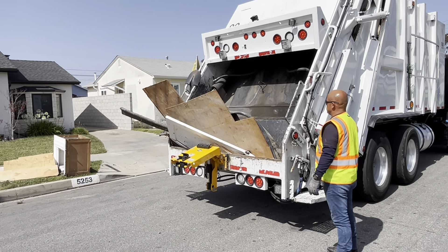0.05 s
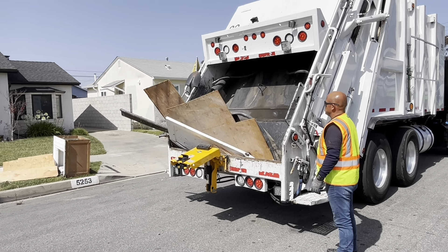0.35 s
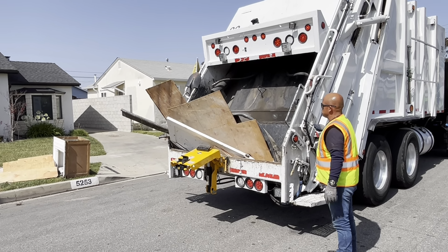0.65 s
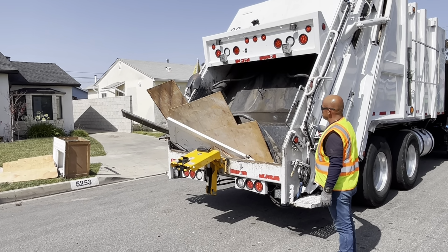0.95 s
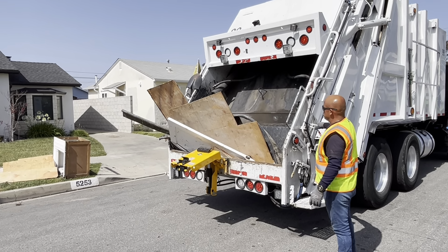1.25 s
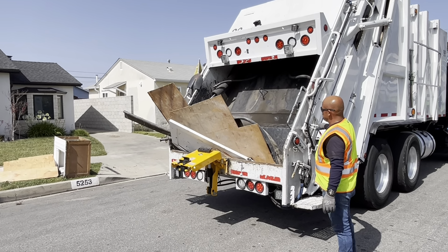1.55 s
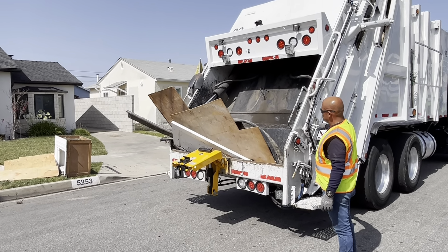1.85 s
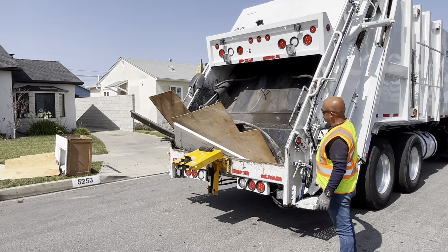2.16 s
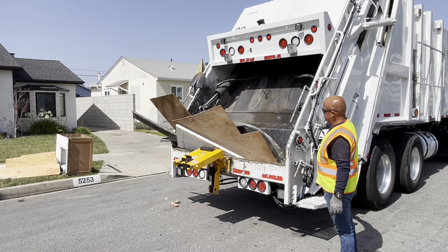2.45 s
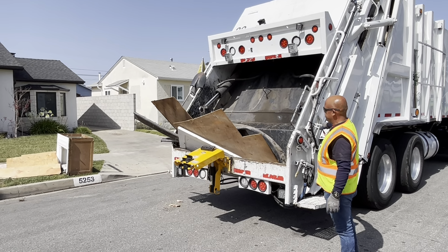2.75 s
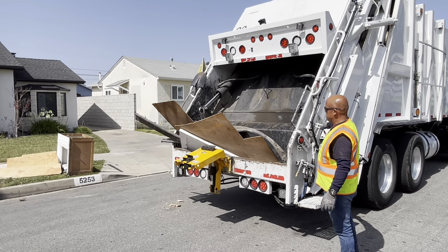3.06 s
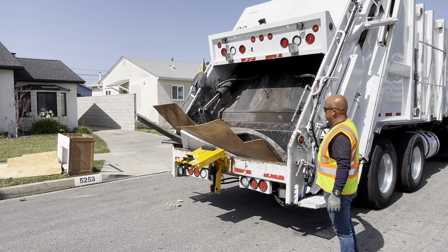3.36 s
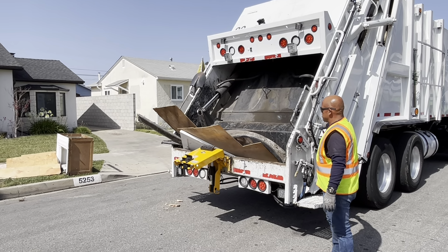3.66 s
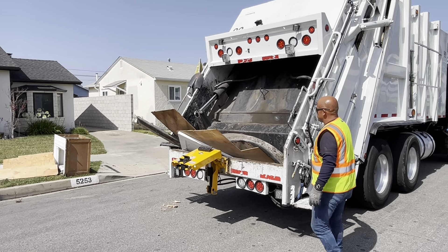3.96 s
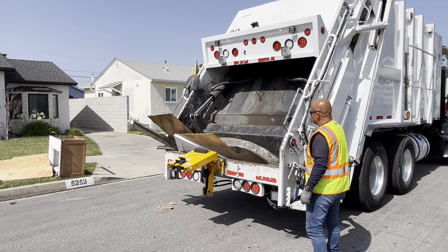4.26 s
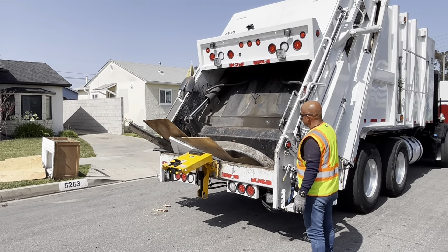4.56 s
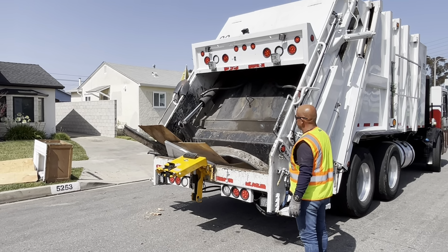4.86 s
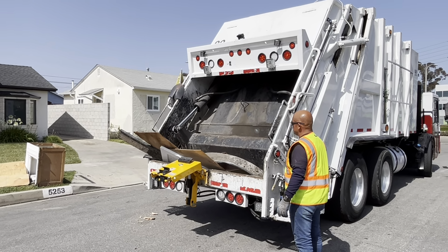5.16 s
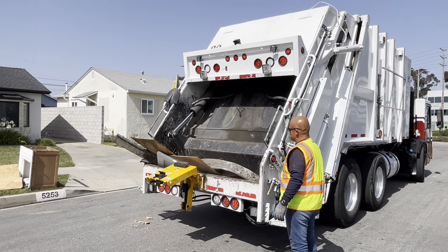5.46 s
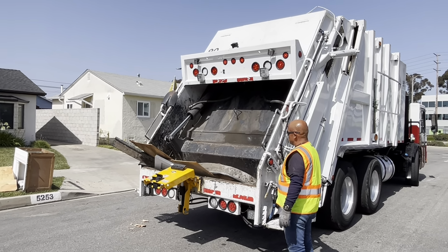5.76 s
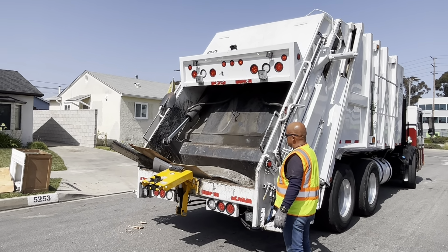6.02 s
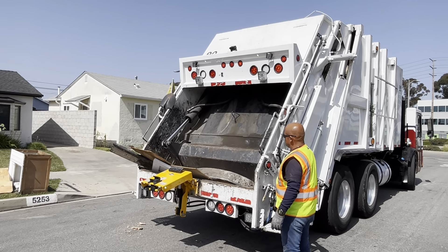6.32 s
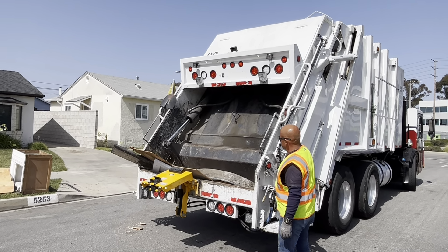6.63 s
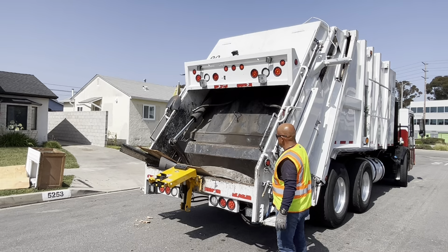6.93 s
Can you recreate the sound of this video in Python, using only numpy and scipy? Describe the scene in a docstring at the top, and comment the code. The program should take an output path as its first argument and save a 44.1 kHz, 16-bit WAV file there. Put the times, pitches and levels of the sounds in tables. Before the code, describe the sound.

Wood snaps, scrapes and grinds in a garbage truck's packer while the engine rumbles and the pump whines, then metal squeaks and clangs.

```python
"""A garbage truck's packer blade crushes a load of wood in a quiet street, a few steps from the listener.
From the start the diesel rumbles, the hydraulic pump hums and whines, and the load grinds and crackles.
Almost at once boards begin to thud, tick, snap and scrape in the hopper, the truck's steel loading bin.
From about 2 seconds on, sliding steel squeals faintly now and then. Around 6 seconds the load shifts
heavily; then a dry joint squeaks and, just before the end, a steel part clangs."""
import sys
import numpy as np
from scipy import signal
from scipy.fft import rfft, irfft, next_fast_len
from scipy.io import wavfile

SR = 44100
rng = np.random.default_rng(int(sys.argv[2]) if len(sys.argv) > 2 else 0)


def master(y):
    """Save y as 16-bit WAV."""
    cut = np.clip(np.atleast_2d(y).T, -1, 1)
    pcm = np.round(cut * 32767)  # scale
    wavfile.write(sys.argv[1], SR, pcm.astype(np.int16))


N = 308259  # length in samples, about 7 seconds

# Levels in the tables are relative: a function may turn a whole table up or down.
# How loudly the truck rumbles under load. Each row: time in seconds, level in dB.
RUMBLE_LEVELS = [(0, -29), (.6, -38), (.85, -34.5), (1.35, -36.5), (1.6, -39.5), (2.3, -36), (3.05, -38),
                 (3.3, -33.5), (3.9, -32.5), (4.95, -30), (5.5, -33), (5.8, -36), (5.98, -27),
                 (6.47, -23.5), (6.6, -34.5), (6.75, -25.5), (6.99, -34)]
# The tone colours of the diesel, the shaking body and the fan. Each row: frequency in Hz, level in dB.
DIESEL_SPECTRUM = [(15, -73), (30, -21), (50, -3), (78, 1), (100, -2.5), (160, -6.5), (220, -8),
                   (330, -14.5), (700, -73.5)]
SHUDDER_SPECTRUM = [(15, -33), (30, 20), (48, 19), (80, 26), (110, -26), (200, -43)]
FAN_SPECTRUM = [(100, 0.5), (400, 3.5), (900, 0), (1300, -6.5), (1850, -8), (2300, -6), (3300, -9.5),
                (4800, -9.5), (6500, -13.5), (10000, -20), (12000, -20.5), (15500, -46)]
# The pump's pitch, which sags as the blade meets resistance. Each row: time in seconds, pitch in Hz.
PUMP_PITCH = [(0, 260.1), (0.5, 258.4), (0.72, 253.5), (1.05, 259.4), (1.5, 257), (2.1, 254.3),
              (3.05, 252.2), (3.3, 251.6), (3.55, 252.4), (3.8, 251.4), (4.3, 256.8), (5.05, 256),
              (5.6, 254.5), (6.22, 248.2), (6.55, 253.5), (6.99, 254.2)]
# The pump's overtones, its higher tones. Each row: multiple of the pump's pitch, level in dB.
PUMP_OVERTONES = [(2, -20), (3, -18.5), (4, -26.5)]
# How loud the pump's hum, overtones and whine are. Each row: time in seconds, level in dB.
HUM_LEVELS = [(0, -30), (.8, -34.5), (1.3, -30), (1.55, -34), (2.05, -28), (2.65, -33), (3.1, -29),
              (4.0, -26.5), (4.3, -30.5), (5.0, -23), (5.55, -25.5), (6.05, -24.5), (6.6, -31.5),
              (6.99, -29)]
OVERTONE_LEVELS = [(0, -29), (.33, -25), (.6, -34), (1.3, -29.5), (2.3, -35), (4.2, -36), (6.99, -29)]
WHINE_LEVELS = [(0, -37), (.36, -37), (.55, -33), (.88, -53), (.98, -38), (1.1, -31), (1.3, -32),
                (1.48, -40), (1.67, -34), (1.94, -34), (2.06, -40), (2.3, -34), (2.7, -47), (3.2, -36),
                (4.3, -34.5), (5.25, -30.5), (5.7, -39), (6.99, -40.5)]
# Brief dips in the hum. Each row: middle in seconds, depth in dB, reach to either side in seconds.
BRIEF_HUM_DIPS = [(.97, 26, 0.039), (1.21, 22, 0.034), (5.77, 22, 0.081), (6.735, 16, 0.03)]
# The strain on the load, heard as how loudly it grinds. Each row: time in seconds, level in dB.
STRAIN_LEVELS = [(0, -28), (.22, -40.5), (.55, -31), (.78, -29), (.93, -46), (1.22, -40.5), (1.35, -36),
                 (2.1, -35.5), (2.7, -34.5), (3.4, -31.5), (3.75, -32.5), (4.5, -32), (5.15, -30),
                 (5.4, -30.5), (5.7, -28), (6.48, -24.5), (6.56, -29), (6.66, -26), (6.8, -33.5),
                 (6.99, -32)]
# The tone colours of debris, small fibres and splinters. Each row: frequency in Hz, level in dB.
GRIND_SPECTRUM = [(120, -23), (250, -4.5), (400, -2), (600, -8), (850, -3), (1200, -10), (1700, -12),
                  (2600, -13), (5000, -35.5)]
CRACKLE_SPECTRUM = [(500, -25), (1400, -10), (2300, 0.5), (3500, -0.5), (5000, -1), (6500, -12),
                    (10000, -16.5), (12000, -21), (15500, -60)]
SPLINTER_SPECTRUM = [(1500, -8), (3500, -2), (5500, 3), (7500, -3.5), (10000, -4.5), (12000, -11),
                     (14500, -12), (16000, -19)]
# Heavy pieces landing on the hopper floor. Each row: start in seconds, level in dB, lowest pitch in Hz.
FLOOR_THUDS = [(.135, -22.5, 169), (0.845, -27, 111), (1.563, -26.5, 162), (2.231, -28, 149),
               (3.303, -12.5, 165), (3.318, -14, 100.9), (3.376, -20, 154), (3.512, -23.5, 173.8),
               (3.741, -17, 187), (3.945, -25, 169), (4.915, -23, 123), (5.976, -19.5, 199),
               (6.40, -18, 164)]
# The floor's ringing tones. Each row: multiple of the lowest pitch, level in dB, seconds to fade 60 dB.
FLOOR_TONES = [(1, -1, 0.061), (1.65, -5, 0.13), (2.35, -1.5, 0.078), (2.9, -2, 0.046), (3.6, -1, 0.028)]
# Single splinters giving way. Each row: start in seconds, level in dB.
SPLINTER_TICKS = [(.282, -46), (.294, -45), (.382, -30), (.722, -33), (0.954, -37), (.99, -35),
                  (2.061, -32), (2.374, -35), (2.627, -34), (2.648, -41), (2.754, -36), (3.095, -39),
                  (3.13, -37), (3.169, -34), (3.579, -25.5), (3.665, -37), (4.78, -44)]
# Boards breaking. Each row: time in seconds, crack level in dB, crack centre in Hz, ring level in dB,
# ring pitch in Hz, splinter level in dB, level of the knock on the hopper in dB.
BOARD_SNAPS = [(0.351, -43.0, 2400, -49, 1400, -52, -51.0), (0.395, -37.5, 2800.0, -47.5, 1460, -56, -44.0),
               (0.412, -34, 2050.0, -36.5, 1140, -37, -32.5), (0.431, -30, 2390.0, -36, 1070, -35.5, -38.5),
               (0.493, -52, 1500.0, -56, 1110.0, -43, -61.0), (0.616, -40, 2800.0, -48, 2180.0, -41, -62),
               (0.641, -28.5, 1780, -31, 2160, -38.5, -37.5), (0.842, -40, 1510, -35.0, 750, -52, -43),
               (1.555, -31, 1740, -34, 1020.0, -43, -33), (1.826, -29.5, 945, -32, 3660, -37, -33.5),
               (2.515, -46, 2050.0, -46, 1180.0, -51.5, -54), (2.704, -37, 2050.0, -38, 980, -48, -43.5),
               (2.858, -30, 1680, -31.5, 1530, -39.5, -42), (2.962, -47, 816, -42.5, 2130.0, -41.0, -41),
               (3.051, -42, 2800.0, -45, 1640.0, -47, -55),
               (3.223, -37.5, 1090.0, -35.5, 2300, -37.0, -44.0),
               (3.241, -38, 1500.0, -38.0, 2670, -43, -43), (3.257, -36, 800.0, -38, 1680, -42, -42),
               (3.29, -32, 1280.0, -28, 1630, -39, -25.5), (3.368, -30, 1090.0, -36.5, 2890.0, -36.5, -35),
               (3.421, -37, 800.0, -38, 2250, -39.5, -38), (3.436, -38.5, 800.0, -36, 2350, -44, -43),
               (3.464, -40.5, 2090, -40, 840.0, -47, -52), (3.722, -23.5, 1280.0, -25.5, 860, -31, -28.5),
               (3.797, -38.5, 2390.0, -42, 1290.0, -46, -53), (3.91, -38.5, 1500.0, -57, 2400, -46, -49),
               (3.937, -30.5, 1090.0, -28.5, 1760, -40, -33), (4.127, -29, 1280.0, -30.0, 2490.0, -35, -37),
               (4.663, -33.5, 1800, -43, 850.0, -37.5, -33.5),
               (4.805, -35.0, 2050.0, -35.5, 2620, -64, -60), (4.99, -34.0, 1500.0, -34.5, 830, -57, -43),
               (5.16, -34, 1750.0, -38.5, 1040.0, -39, -45), (5.24, -29.5, 1800, -32.5, 960, -45, -29.5),
               (5.536, -34, 1500.0, -35, 2710.0, -41, -37), (5.565, -33.0, 1280.0, -43, 905, -51, -33),
               (5.676, -35, 1740, -37, 2930, -64, -56), (5.91, -31, 1280.0, -33.5, 2710.0, -61, -43),
               (5.974, -30, 1750.0, -31, 1000, -37, -28.5), (6.159, -44, 1770, -35.5, 2912, -58, -55)]
# The tone colour of a crack. Each row: multiple of its centre frequency, level in dB.
CRACK_SPECTRUM = [(.2, -17.5), (.5, -4), (1, 2.5), (2, -4.5), (4, -22.5), (8, -50.5)]
# The tone colours of a knock on the hopper and of a scrape. Each row: frequency in Hz, level in dB.
KNOCK_SPECTRUM = [(80, -4), (200, -9.5), (360, 15.5), (550, 13.5), (850, 6.5), (1300, -30.5)]
SCRAPE_SPECTRUM = [(600, 4), (1500, -2.5), (2600, -1), (4500, -6), (6000, -11), (10000, -16), (15500, -35)]
# The hopper wall's ringing tones. Each row: pitch in Hz, level in dB, seconds to fade 60 dB.
WALL_TONES = [(352.6, -19, 0.37), (373, 3.5, 0.2), (481, 1, 0.097), (529, 11.5, 0.021), (712, 8.5, 0.12),
              (889, 6.5, 0.14)]
# Boards scraping on each other, and at 6.377 s a brief hiss of fine splintering played the same way. Each row:
# start in seconds, level in dB, fade in seconds, pitch in Hz.
BOARD_SCRAPES = [(0.45, -45, 0.017, 3600), (0.651, -36, 0.016, 3400), (0.792, -35, 0.013, 2800),
                 (3.241, -38, 0.047, 3180), (3.387, -43, 0.12, 3600), (0.519, -27, 0.012, 2980),
                 (0.565, -31.5, 0.015, 2980), (0.677, -27, 0.0082, 2200), (0.765, -32, 0.019, 1800),
                 (1.331, -32.5, 0.029, 2060), (1.698, -33.5, 0.0085, 2600), (1.835, -27, 0.016, 2600),
                 (2.209, -32, 0.022, 1730), (2.572, -34, 0.015, 1100), (2.765, -32, 0.0083, 2000),
                 (2.814, -28, .006, 2300), (2.897, -30.5, .008, 2000), (4.177, -33, 0.0041, 2600),
                 (4.339, -32.5, 0.022, 2370), (4.435, -36, 0.055, 1570), (4.793, -40.5, 0.02, 2400),
                 (4.939, -34.5, 0.039, 1650), (4.967, -27.5, 0.0086, 1630), (5.646, -28, 0.0077, 1505),
                 (5.674, -28, 0.03, 2840), (5.742, -34, 0.03, 3000), (5.786, -27, 0.02, 1940),
                 (5.867, -29, 0.0096, 2400), (5.935, -29, 0.024, 2500), (6.106, -33.5, 0.025, 2300),
                 (6.189, -30.5, 0.017, 2360), (6.268, -33.5, .013, 2900), (6.326, -45, 0.004, 850),
                 (6.361, -34.5, 0.032, 2177), (6.377, -31, 0.036, 10700), (6.468, -26, 0.015, 2360),
                 (6.706, -21.5, 0.0093, 2700), (6.812, -33.5, 0.011, 3093)]
# The thin squeal of sliding steel. Each row: time in seconds, pitch in Hz, level in dB.
SQUEAL_PATH = [(1.78, 5550, -64), (1.86, 5550, -50), (2.05, 5548, -56), (2.22, 5542, -46.5),
               (2.38, 5554, -55), (2.5, 5552, -52), (2.66, 5530, -56), (2.92, 5600, -47), (3.02, 5600, -51),
               (3.11, 5660, -50), (3.2, 5630, -57), (3.34, 5670, -46), (3.47, 5694, -57), (3.56, 5680, -43),
               (3.66, 5850, -51), (3.78, 5748, -70), (6.05, 5722, -66), (6.14, 5700, -47),
               (6.23, 5752, -42), (6.29, 5750, -50), (6.48, 5755, -49), (6.56, 5755, -70)]
# The tones in a joint's squeak. Each row: multiple of the lowest pitch, level in dB.
SQUEAK_TONES = [(1, -10), (2, 9.5), (3, -19)]
# Blows on steel. Each row: start in seconds, level of the plate's crash in dB, level of the ring in dB.
STEEL_BLOWS = [(6.585, -27, -40), (6.591, -17, -12.5), (6.600, -23, -38), (6.706, -35, -31),
               (6.815, -48, -41)]
# The struck steel's ringing tones. Each row: pitch in Hz, level in dB, seconds to fade 60 dB.
STEEL_TONES = [(377, -7, .7), (419, -7, .5), (520, -9, .35), (877, -4, .35), (1184, -2.5, .35),
               (1290, -4, .3), (1410, -6, .3), (1680, -3, .25), (1775, -3, .25), (1954, -8, .22),
               (2142, -3, .26), (2546, -9, .4), (2696, -5.5, .33), (2850, -7, .22), (3200, -3.5, .4),
               (3320, -8, .4), (3607, -9, .2), (4335, -9, .33), (4520, -10, .28), (4891, -6, .33),
               (5365, -1, .1), (5386, -4, .6), (6073, -11, .15), (9366, -15, .16), (9856, -13, .16)]
# The tone colour of the plate's crash. Each row: frequency in Hz, level in dB.
PLATE_SPECTRUM = [(300, -2.5), (900, -1), (1500, -2.5), (2500, -7), (3700, -13), (5000, -0.5), (6500, -14),
                  (9800, -17), (11500, -28), (15500, -30)]
# How long the street's echo lasts. Each row: frequency in Hz, seconds to fade 60 dB.
ECHO_TIMES = [(100, 0.082), (500, 0.24), (2500, 0.3), (6000, 0.45), (14000, 0.015)]
# How alike the two microphones sound. Each row: frequency in Hz, likeness from 0 to 1.
STEREO_LIKENESS = [(60, .92), (300, .92), (800, .78), (2000, .66), (2900, .65), (4000, .25), (6500, .3),
                   (8000, .88), (12000, .92), (13500, .62), (15000, .8)]
# How far the left wave runs ahead of the right. Each row: frequency in Hz, lead in radians.
LEFT_LEAD = [(100, 0), (1000, -.25), (2300, -.55), (2700, 1.1), (5000, 1.6), (5600, 3.9), (6500, 5.6),
             (7600, 3.4), (8700, 2.9), (11200, .1), (12900, -.1), (15000, -2.8)]
# How much louder the left side is. Each row: frequency in Hz, left minus right in dB.
LEFT_BALANCE = [(60, -0.5), (230, 3), (700, 1.0), (1300, 0), (2300, -5.5), (3300, -1.5), (4500, 6.5),
                (6800, 2), (8000, 0)]

GATHER_S = 0.002994  # a crack builds for this many seconds before the board gives way


def amp(db):
    """Turns decibels into a number to multiply a sound by."""
    return 10 ** (np.asarray(db) / 20)


def unit(x):
    """Scales a signal to an average strength (rms) of 1."""
    return x / np.sqrt(np.mean(x ** 2) + 1e-20)


def read(points, hz):
    """Looks up a frequency in a table, blending between rows on a logarithmic scale."""
    row_hz, value = np.transpose(points)
    return np.interp(np.log(hz + 1), np.log(row_hz + 1), value)


def curves(rows):
    """Joins the rows of a time table with straight lines, giving one curve per value column."""
    times, *columns = np.transpose(rows)
    return [np.interp(np.arange(N) / SR, times, column) for column in columns]


def add(mix, start_s, sound):
    """Mixes in a two-channel sound at the given time."""
    part = mix[:, max(round(start_s * SR), 0):][:, :sound.shape[1]]
    part += sound[:, :part.shape[1]]


def colour(x, spectrum):
    """Filters a sound to the given tone colour and scales it to strength 1."""
    size = 2 * next_fast_len(x.shape[1] // 2 + 1024)
    log_gain = np.log(amp(read(spectrum, abs(np.fft.fftfreq(2048, 1 / SR)))))
    taps = np.fft.ifft(np.exp(np.conj(signal.hilbert(log_gain)))).real  # rings after a click, not before
    return unit(irfft(rfft(x, size) * rfft(taps, size), size)[:, :x.shape[1]])


def noise(spectrum, size=N):
    """Two channels of noise with the given tone colour."""
    return colour(rng.standard_normal((2, size)), spectrum)


def wander(rate_hz, size=N):
    """A random curve of strength 1 that drifts up and down at about the given rate."""
    knots = rng.standard_normal(4096)
    return unit(np.interp(np.arange(size) / SR * 2 * rate_hz, np.arange(len(knots)), knots))


def burst(t, rise_s, fall_s):
    """A loudness shape that swells and dies away."""
    return (1 - np.exp(-t / rise_s)) * np.exp(-t / fall_s)


def tone(turns):
    """A pure tone in two channels a quarter cycle apart; turns counts the cycles so far."""
    return np.sqrt(2) * np.array([np.cos(2 * np.pi * turns), np.sin(2 * np.pi * turns)])


def rough_tone(turns, rate_hz, depth):
    """A tone roughened by chattering contact: its strength and timing swing at random."""
    swings = wander(rate_hz, len(turns)) + 1j * wander(rate_hz, len(turns))
    chatter = (1 + depth * swings) / np.sqrt(1 + 2 * depth ** 2)
    wave = np.sqrt(2) * np.exp(2j * np.pi * turns) * chatter
    return np.array([wave.real, wave.imag])


def engine(heave_db=1.7, throb=0.28, firings_per_pump_cycle=0.28):
    """The diesel rumbles, its fan noise throbs in step with the pump, and heavy load shakes the body."""
    rumble_db = curves(RUMBLE_LEVELS)[0] + heave_db * wander(rate_hz=6)
    rumble = amp(rumble_db + 0.1) * noise(DIESEL_SPECTRUM)
    shudder = amp(2 * rumble_db + 18) * noise(SHUDDER_SPECTRUM)  # grows twice as fast in dB
    firings = np.cumsum(curves(PUMP_PITCH)[0] * firings_per_pump_cycle) / SR
    fan = amp(-41.5) * (1 + throb * np.cos(2 * np.pi * firings)) * noise(FAN_SPECTRUM)
    return rumble + shudder + fan


def pump_hum(flutter=0.14, overtone_flutter=0.088, jitter=0.0033, sway_db=0.54):
    """The pump's pressure ripple hums through the truck body, wavering a little in level and pitch."""
    t = np.arange(N) / SR
    dips_db = sum(depth * np.exp(-((t - s) / reach_s) ** 2) for s, depth, reach_s in BRIEF_HUM_DIPS)
    hum_db = curves(HUM_LEVELS)[0] - dips_db + sway_db * wander(4.7)
    turns = np.cumsum(curves(PUMP_PITCH)[0] * (1 + jitter * wander(25))) / SR
    hum = amp(hum_db) * (1 + flutter * wander(30)) * tone(turns)
    overtones = sum(amp(db) * (1 + overtone_flutter * wander(31)) * tone(multiple * turns)
                    for multiple, db in PUMP_OVERTONES)
    return hum + amp(curves(OVERTONE_LEVELS)[0]) * overtones


def pump_whine(pitch_ratio=9.41, jitter=0.00387, flutter=0.23):
    """The pump's drive gives a thin, unsteady whine that follows the pump's speed."""
    hz = pitch_ratio * curves(PUMP_PITCH)[0] * (1 + jitter * wander(70))
    gain = amp(curves(WHINE_LEVELS)[0] - 9) * (1 + flutter * wander(40))
    return gain * tone(np.cumsum(hz) / SR)


def grains(per_s, spread_db, clump_db):
    """Random clicks of very uneven size that come in clumps."""
    sizes_db = spread_db * np.minimum(rng.exponential(1, N), 3.2)
    clicks = amp(sizes_db) * (rng.random(N) < per_s / SR) * rng.uniform(-0.98, 1, (2, N))
    return clicks * amp(clump_db * np.tanh(wander(28)))


def crushing(muffle_db_per_s=0.4, muffle_mid_s=3):
    """Debris grinds along the hopper while countless small fibres give way; strain makes both louder."""
    strain_db = curves(STRAIN_LEVELS)[0]
    grind = colour(grains(per_s=2500, spread_db=3.2, clump_db=3), GRIND_SPECTRUM)
    crackle = colour(grains(per_s=2000, spread_db=4.3, clump_db=4), CRACKLE_SPECTRUM)
    muffled_db = muffle_db_per_s * (np.arange(N) / SR - muffle_mid_s)  # the blade closes over the load
    return amp(strain_db - 4) * grind + amp(strain_db - 9 - muffled_db) * crackle


def thud(t, hz, rise_s=0.0013):
    """A heavy piece lands and the hopper floor rings, low and short."""
    ring = sum(amp(db - 60 * t / fade_s) * tone(multiple * hz * t + rng.random())
               for multiple, db, fade_s in FLOOR_TONES)
    return (1 - np.exp(-t / rise_s)) * ring


def tick(t):
    """One splinter gives way with a tiny burst of bright noise."""
    return burst(t, rise_s=0.00033, fall_s=0.0032) * noise(SPLINTER_SPECTRUM, len(t))


def snap(crack_db, crack_hz, ring_db, ring_hz, splinter_db, knock_db):
    """Fibres tear harder and harder until a board breaks: a crack, a short ring, splinters, a knock."""
    t = np.arange(6000) / SR
    fibres_per_s, unevenness = 8000, 0.3
    build_s, tear_s, straggle_s = 0.001, 0.0067, 0.04
    since_break = np.maximum(t - GATHER_S, 0)
    build_up = np.exp(np.minimum(t - GATHER_S, 0) / build_s)
    die_away = np.exp(-since_break / tear_s) + 0.045 * np.exp(-since_break / straggle_s)
    fibres = np.exp(unevenness * rng.standard_normal(len(t))) * (rng.random(len(t)) < fibres_per_s / SR)
    tearing = build_up * die_away * fibres
    crack_clicks, ring_clicks, splinter_clicks = tearing * rng.uniform(-1.2, 1, (3, 2, len(t)))
    crack = colour(crack_clicks, [(multiple * crack_hz, db) for multiple, db in CRACK_SPECTRUM])
    ring = signal.lfilter(*signal.iirpeak(ring_hz, Q=9, fs=SR), ring_clicks)
    ring = np.array([unit(channel) for channel in ring])
    splinters = colour(splinter_clicks, SPLINTER_SPECTRUM)
    wood = amp(crack_db) * crack + amp(ring_db) * ring + amp(splinter_db) * splinters
    return wood + amp(knock_db) * knock(since_break)


def knock(t, ring_rise_s=0.0069):
    """Wood bumps the steel wall, whose tones come out differently with the spot that is struck."""
    bump = colour(burst(t, rise_s=0.0004, fall_s=0.014) * rng.standard_normal((2, len(t))), KNOCK_SPECTRUM)
    wall = sum(amp(db - 60 * t / fade_s) * tone(hz * rng.uniform(0.93, 1.04) * t + rng.random())
               for hz, db, fade_s in WALL_TONES)
    return bump + 0.72 * unit((1 - np.exp(-t / ring_rise_s)) * wall)


def scrape(t, fade_s, hz, slips_per_s=2800, unevenness=0.45, ring_gain=0.58):
    """One board judders over another in uneven slips, which also ring the board at its own pitch."""
    sizes = np.exp(unevenness * rng.standard_normal(len(t))) * (rng.random(len(t)) < slips_per_s / SR)
    slips = colour(sizes * rng.choice([-1, 1], (2, len(t))), SCRAPE_SPECTRUM)
    ring = unit(signal.lfilter(*signal.iirpeak(hz, Q=1.5, fs=SR), slips))
    return burst(t, rise_s=0.0035, fall_s=fade_s) * unit(slips + ring_gain * ring)


def boards():
    """Places every thud, tick, snap and scrape of the wood at its time."""
    t, out = np.arange(SR // 4) / SR, np.zeros((2, N))
    for start_s, db, hz in FLOOR_THUDS:
        add(out, start_s, amp(db) * thud(t, hz))
    for start_s, db in SPLINTER_TICKS:
        add(out, start_s, amp(db + 2.5) * tick(t))
    for time_s, *board in BOARD_SNAPS:
        add(out, time_s - GATHER_S / 2, snap(*board))
    for start_s, db, fade_s, hz in BOARD_SCRAPES:
        add(out, start_s, amp(db + 9) * scrape(t, fade_s, hz))
    return out


def squeal():
    """Steel chatters along steel: a thin tone that catches and lets go, rising as the blade bears down."""
    hz, db = curves(SQUEAL_PATH)
    return amp(db) * rough_tone(np.cumsum(hz) / SR, rate_hz=55, depth=0.35)


def squeak(start_s=6.491, lowest_hz=2170):
    """A dry joint slips once: a short, rough note that rings out."""
    t, out = np.arange(SR // 5) / SR, np.zeros((2, N))
    note = sum(amp(db) * rough_tone(multiple * lowest_hz * t, rate_hz=160, depth=0.65)
               for multiple, db in SQUEAK_TONES)
    add(out, start_s, amp(-21) * burst(t, rise_s=0.0091, fall_s=0.02) * note)
    return out


def clangs(rise_s=0.00084, crash_fade_s=0.024):
    """Steel slips and chatters; each blow is a short crash of the plate and tones that ring on."""
    t, out = np.arange(SR // 2) / SR, np.zeros((2, N))
    for start_s, crash_db, ring_db in STEEL_BLOWS:
        ring = sum(amp(db - 60 * t / fade_s)
                   * rough_tone(hz * t + rng.random(), rate_hz=10 + hz / 150, depth=0.32)
                   for hz, db, fade_s in STEEL_TONES)
        crash = np.exp(-t / crash_fade_s) * noise(PLATE_SPECTRUM, len(t))
        blow = amp(ring_db - 8.5) * ring + amp(crash_db + 5.5) * crash
        add(out, start_s, (1 - np.exp(-t / rise_s)) * blow)
    return out


def echoes(x, hopper_db=-9, hopper_fade_s=0.018, street_db=-14, dull_hz=4500):
    """Adds quick echoes inside the hopper and a faint tail from truck and houses; both lose treble."""
    t = np.arange(SR // 2) / SR
    shape, bounces_per_s, gap_s = (2, 2, len(t)), 2000, 0.004
    near, far = rng.standard_normal(shape) * (rng.random(shape) < bounces_per_s / SR) * (t > gap_s)
    hz, frame_s, bands = signal.stft(far, SR, nperseg=256)
    fade = amp(-60 * frame_s / read(ECHO_TIMES, hz)[:, None])  # each frequency fades at its own speed
    street = signal.istft(bands * fade, SR, nperseg=256)[1][:, :len(t)]
    hopper = near * np.exp(-t / hopper_fade_s)
    response = (amp(hopper_db) * unit(hopper) + amp(street_db) * unit(street)) / np.sqrt(len(t))
    response = signal.lfilter(*signal.butter(1, dull_hz, fs=SR), response)
    return x + signal.fftconvolve(x, response, axes=1)[:, :N]


def scene():
    """All the sounds together, in two channels: a part both microphones share and a scattered part."""
    truck = engine() + pump_hum() + pump_whine()
    load = echoes(crushing() + boards())
    return truck + load + squeal() + squeak() + clangs()


def record(dry, low_cut_hz=28, high_cut_hz=15750):
    """Two close microphones hear the scene; deep bass, overloud peaks and the top treble are cut off."""
    size = next_fast_len(N + 2048)
    hz = np.fft.rfftfreq(size, 1 / SR)
    shared, scattered = rfft(dry, size) * hz ** 3 / np.hypot(hz ** 3, low_cut_hz ** 3)
    likeness = np.clip(read(STEREO_LIKENESS, hz), 0, 1)
    tilt = amp(read(LEFT_BALANCE, hz) / 2)
    lag = np.exp(-1j * read(LEFT_LEAD, hz))
    right = (likeness * shared + np.sqrt(1 - likeness ** 2) * scattered) * lag
    pair = irfft(np.array([shared * tilt, right / tilt]), size)[:, :N]
    treble_cut = signal.firwin(511, high_cut_hz, window=("kaiser", 9), fs=SR)
    return signal.oaconvolve(np.clip(pair, -1, 1), treble_cut[None], "same")


dry = scene()
out = record(dry)
master(out)
```